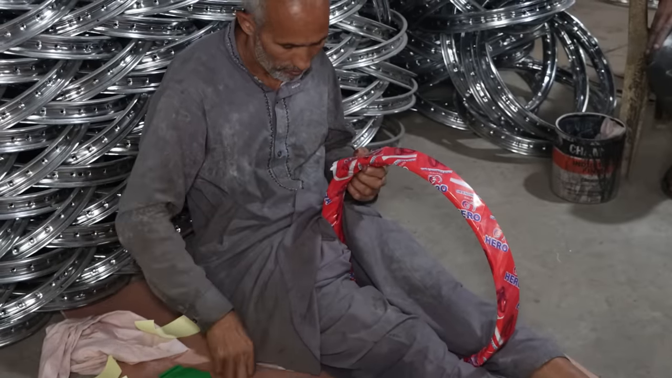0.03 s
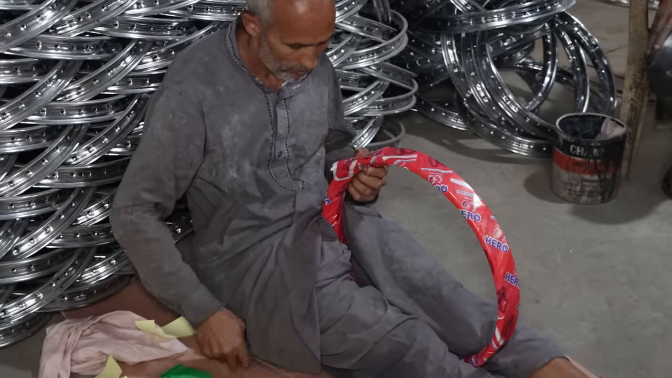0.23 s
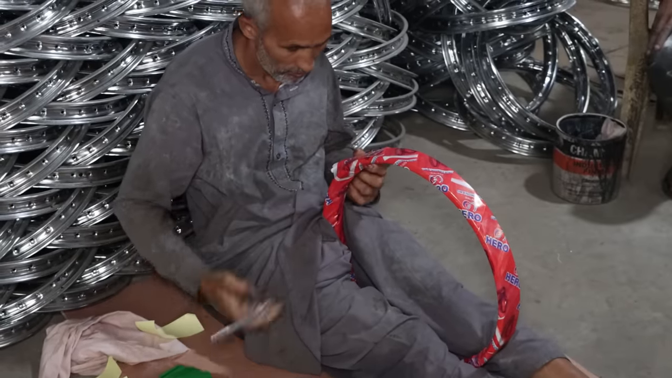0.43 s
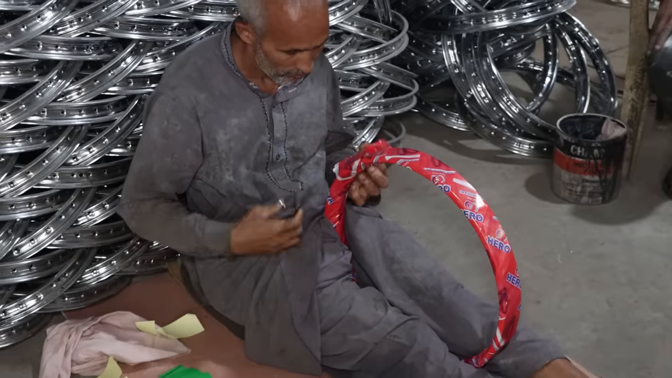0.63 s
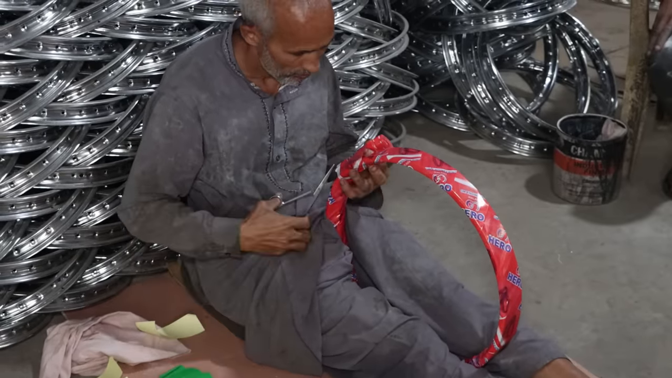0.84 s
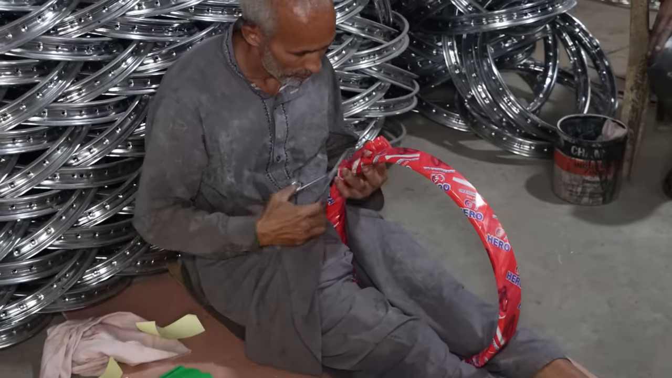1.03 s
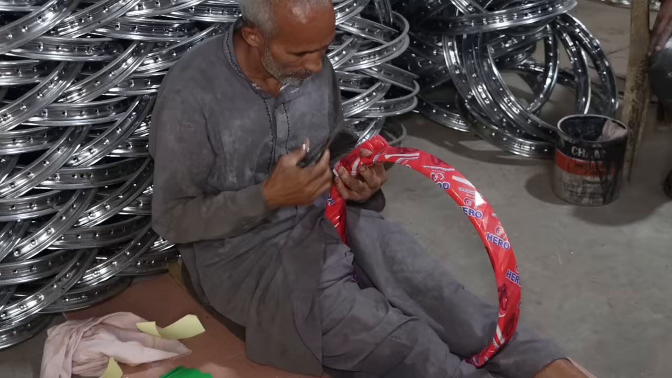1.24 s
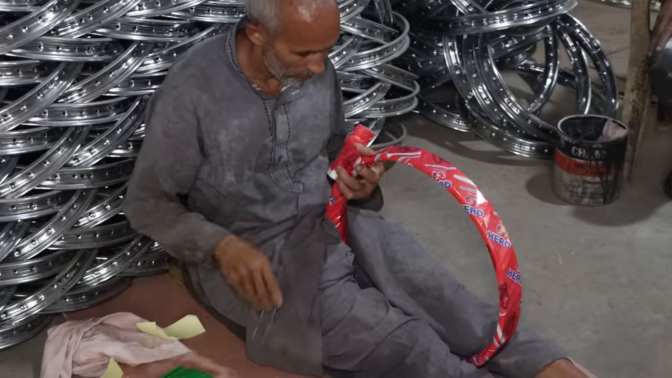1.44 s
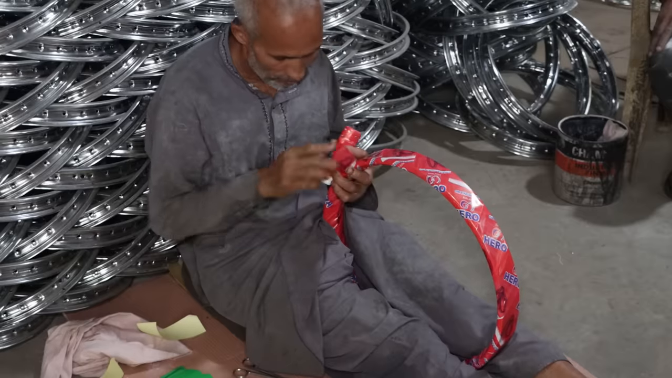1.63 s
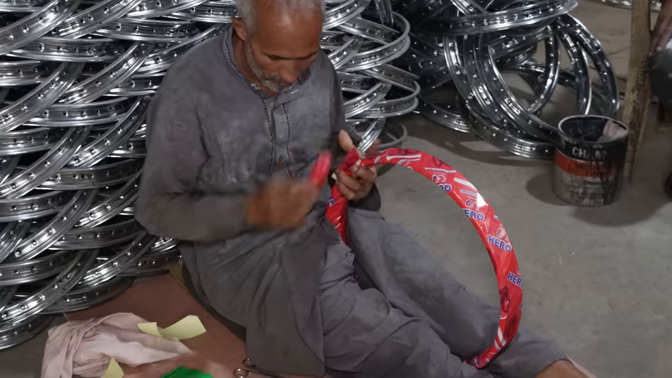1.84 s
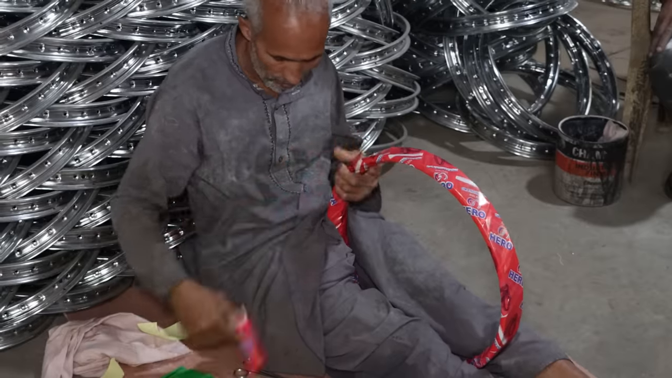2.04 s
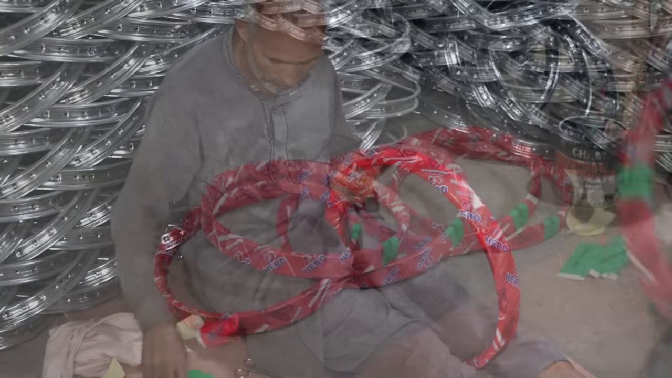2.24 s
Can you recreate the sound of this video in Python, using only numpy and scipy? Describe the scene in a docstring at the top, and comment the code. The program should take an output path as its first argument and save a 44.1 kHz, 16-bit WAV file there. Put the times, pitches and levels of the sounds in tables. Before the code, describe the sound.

A metal rim dropped on a pile makes a loud, short clatter with low bumps at about 1.6 s, then a tiny rattle and brief room tail. Low machine hum runs throughout. Close by, a blade snips and taps near 0.3 s, and snips sharply at 1.2 s, with faint scrapes. A distant heavy crash booms from 0.6 s and fades slowly. Soft rubbing and a tap follow after 2 s.

```python
"""Machines hum in a workshop stacked with metal rims; close by, a bladed tool snips, scrapes and taps.
Something heavy lands far off in the hall, as filtered noise that swells and dies away.
A piece of metal is then dropped on a pile: low sine bumps, a clatter of damped modes and noise cracks,
and a brief chatter of the rims, which the room answers with a tail of decaying noise."""
import sys
import numpy as np
from scipy import signal
from scipy.fft import rfft, irfft, next_fast_len
from scipy.io import wavfile
from scipy.ndimage import uniform_filter1d, map_coordinates

SR = 44100
rng = np.random.default_rng(int(sys.argv[2]) if len(sys.argv) > 2 else 0)


def to_wav(sig):
    """Store sig (one row per channel, or 1-D mono) as 16-bit WAV at the path in sys.argv[1].

    Samples outside -1..1 are clipped; the rate is SR.
    """
    pcm = np.clip(np.atleast_2d(sig), -1, 1) * 32767
    pcm = np.round(pcm).astype(np.int16)
    wavfile.write(sys.argv[1], SR, pcm.T)  # frames by channels


N = 101430

# stereo width of noise, room and modes: (frequency [Hz], side over mid [ratio])
WIDTH = [(60, 0.11), (200, 0.062), (600, 0.3), (1200, 0.52), (2500, 0.95), (12000, 1)]
# spectrum of the noise where metal strikes metal: (frequency [Hz], level [dB])
CRACK = [(40, -48), (200, -42), (500, -22), (800, -8), (1400, 3), (2500, 0), (4500, -10.5), (6000, -11),
         (9000, -19), (13000, -18), (16000, -38)]
CRACK_T60 = 0.014  # s
METAL_PAN_DB = -1  # left over right, of the dropped metal and the pile
TREBLE_HZ = 2530  # where a contact's treble begins
BLADE_WIDTH = 0.6  # side over mid of snips and taps


def amp(db):
    """Level to amplitude: 20 dB is a factor of ten."""
    return 10 ** (np.asarray(db) / 20)


def unit(x):
    """Normalization: scale to rms 1."""
    return x / np.sqrt(np.mean(x ** 2) + 1e-20)


def along(points, hz):
    """Interpolation of (frequency [Hz], value) points along a logarithmic frequency axis."""
    f, v = np.transpose(points)
    return np.interp(np.log(hz + 1), np.log(f + 1), v)


def since(s):
    """Elapsed time: seconds since s, zero before it."""
    return np.maximum(np.arange(N) / SR - s, 0)


def fade(t, t60):
    """Exponential decay: the level falls 60 dB in t60 seconds."""
    return np.exp(-np.log(1000) * t / t60)


def onset(t, rise):
    """Exponential build-up from zero towards 1, with time constant rise in seconds."""
    return 1 - np.exp(-t / rise)


def wobble(rate):
    """Band-limited fluctuation: a smooth random curve with rate knots a second."""
    return map_coordinates(rng.standard_normal(4096), [np.arange(N) * rate / SR], mode="wrap")


def pair(mid, side):
    """Sum and difference stereo: left is mid plus side, right is mid minus side."""
    return np.array([mid + side, mid - side])


def panned(db, pan_db):
    """Level difference panning: left and right gains pan_db apart around db."""
    return amp([[db + pan_db / 2], [db - pan_db / 2]])


def filtered(x, response):
    """Linear filtering: the spectrum of x times a response of frequency."""
    m = next_fast_len(N + SR // 2)
    return irfft(rfft(x, m) * response(np.fft.rfftfreq(m, 1 / SR)), m)[..., :N]


def coloured(x, points, size=2048):
    """Minimum-phase filtering: a causal response of unit energy, found by folding the cepstrum."""
    cepstrum = irfft(np.log(amp(along(points, np.fft.rfftfreq(size, 1 / SR)))))
    cepstrum[1:size // 2] *= 2
    cepstrum[size // 2 + 1:] = 0
    h = irfft(np.exp(rfft(cepstrum)))
    return signal.fftconvolve(x, h[None] / np.linalg.norm(h), axes=1)[:, :N]


def mid_side_gains(spectrum, hz):
    """Frequency-dependent width: gains of mid and side for a (frequency [Hz], level [dB]) spectrum."""
    return amp(along(spectrum, hz)) * np.array([np.ones_like(hz), along(WIDTH, hz)])


def diffuse(spectrum):
    """Diffuse field: noise of rms 1, nearly mono in the bass and wide in the treble."""
    noise = rng.standard_normal((2, N))
    return unit(pair(*filtered(noise, lambda hz: mid_side_gains(spectrum, hz))))


def dying(x, t60s):
    """Frequency-dependent decay: each band of x dies at its own speed."""
    hz, t, z = signal.stft(x, SR, nperseg=512)
    decay = amp(-60 * t / along(t60s, hz)[:, None])
    return signal.istft(z * decay, SR, nperseg=512)[1][:, :N]


def burst(t, width, t60):
    """Impact noise: an exponentially dying stereo burst."""
    noise = rng.standard_normal((2, len(t))) * [[1], [width]]
    return pair(*noise) * fade(t, t60)


def struck(modes, t, scatter_db):
    """Modal synthesis: one stereo ring of damped sines, each blow weighting its modes anew."""
    ring_width = 0.66
    rings = np.array([amp(db + scatter_db * rng.normal()) * fade(t, t60) * np.sin(2 * np.pi * hz * t)
                      for hz, db, t60 in modes])
    mid = rng.choice([-1, 1], len(modes)) @ rings
    side = ring_width * rng.standard_normal(len(modes)) @ rings
    return pair(mid, side)


def add(track, s, x, treble_db):
    """Superposition: lay one contact into the track, its treble raised or lowered by treble_db."""
    low = signal.lfilter(*signal.butter(1, TREBLE_HZ, fs=SR), x)
    part = track[:, round(s * SR):][:, :x.shape[1]]
    part += (low + amp(treble_db) * (x - low))[:, :part.shape[1]]


def room(x):
    """Reverberation: a near sound convolved with coloured noise that decays band by band."""
    # reverberation time: (frequency [Hz], t60 [s])
    decay_times = [(200, 0.34), (800, 0.44), (2000, 0.6), (5000, 0.41), (12000, 0.28)]
    # colour of the tail: (frequency [Hz], level [dB])
    colour = [(150, -5), (500, 12), (900, 8.5), (1500, 0), (2500, -3.5), (3500, -0.5), (5000, -4),
              (12000, 0)]
    rise_s = 0.0013
    hz, t, z = signal.stft(rng.standard_normal((2, SR // 2)), SR, nperseg=256)
    envelope = fade(t, along(decay_times, hz)[:, None]) * onset(t, rise_s)
    z = z * mid_side_gains(colour, hz)[..., None] * envelope
    tail = pair(*signal.istft(z, SR, nperseg=256)[1])
    return signal.fftconvolve(x.mean(0)[None], tail / np.linalg.norm(tail[0]), axes=1)[:, :N]


def machines():
    """Narrow-band modulation: motor lines waver in amplitude and phase over the hall's broadband rush."""
    # motor lines: (frequency [Hz], mid level [dB rms], unsteadiness [ratio])
    lines = [(119.4, -49.5, 0.42), (204.2, -46.5, 1), (259.4, -38, 0.22), (367.2, -48.5, 0.96),
             (430.3, -47, 0.13), (497.6, -44.5, 0.31), (546.5, -50.5, 1), (583.4, -52.5, 0.12)]
    # spectrum of the rush: (frequency [Hz], level [dB])
    rush_spectrum = [(21, -46), (35, -14.5), (86, -25), (105, -16), (195, -4), (227, -8), (258, -5.5),
                     (325, -9), (420, -10), (454, -12.5), (490, -9.5), (758, -20), (840, -18),
                     (1960, -22.5), (2220, -28), (3020, -29), (12400, -46.5), (16000, -56.5)]
    # slow change of the rush: (time [s], level [dB])
    rush_swell = [(0, 0), (.5, 0.24), (1.1, 0.4), (1.5, 1), (1.95, -1), (2.3, -2)]
    waver_rate, hum_width = 14, 0.07  # knots a second, side over mid
    rush_db, patchy_db = -32, 0.6

    hum = np.zeros((2, N))
    for hz, db, unsteady in lines:
        swell = 1 + unsteady * (wobble(waver_rate) + 1j * wobble(waver_rate))
        tone = swell * np.exp(2j * np.pi * (hz * since(0) + rng.random()))
        hum += amp(db) * pair(unit(tone.real), hum_width * wobble(waver_rate) * tone.imag)

    # the rush is slightly uneven over time and frequency
    z = signal.stft(diffuse(rush_spectrum), nperseg=512)[2]
    patches = uniform_filter1d(rng.standard_normal(z.shape[1:]), 6, 0)
    patches = uniform_filter1d(patches, 14, 1)
    rush = signal.istft(z * amp(patchy_db * unit(patches)), nperseg=512)[1][:, :N]
    swell_db = np.interp(since(0), *np.transpose(rush_swell))
    return hum + amp(rush_db + swell_db) * rush


def shears():
    """Impulsive excitation: the blades' bright noise clicks each set off a short modal ring."""
    # clicks: (time [s], level [dB], treble [dB], pan, left over right [dB])
    snips = [(0.082, -46, 10, -2), (0.3, -33, -3, 0), (1.1781, -21, -6, 0), (1.1825, -20, 2.5, -1),
             (1.1835, -16.5, -12, -7), (1.2547, -32, 7.5, -1), (1.399, -37.5, -1.5, 5)]
    # spectrum of a click: (frequency [Hz], level [dB])
    blade_spectrum = [(300, -11), (1400, -4), (2250, 5), (3000, -1.5), (4300, 0.5), (5200, -3.5),
                      (6600, -0.5), (9000, -1), (10000, -2), (11200, 1.5), (12700, -1), (14000, -8),
                      (16000, -15)]
    # ring of the blades: (frequency [Hz], level [dB], t60 [s])
    blade_modes = [(1787, -1, 0.085), (2000, -1.5, 0.095), (2343, -1, 0.073), (3460, -6.5, .1),
                   (4480, -1, .08)]
    click_t60, ring_db, wet_db = 0.01, -19, -0.5  # s, dB, dB
    out, t = np.zeros((2, N)), np.arange(SR // 10) / SR
    for s, db, treble_db, pan_db in snips:
        track = np.zeros((2, N))
        click = burst(t, BLADE_WIDTH, click_t60)
        add(track, s, click * panned(db, pan_db), treble_db)
        near = coloured(track, blade_spectrum)
        ring = struck(blade_modes, t, scatter_db=1.5)
        add(near, s, amp(db + ring_db) * ring, treble_db)
        out += near + amp(wet_db) * room(near)
    return out


def handling(grain_db=2, grain_rate=300):
    """Friction: rubs are grainy noise, and thin metal sings as fluttering tones that ring on after a hold."""
    # rubbing of blades and wrapping: (time [s], length [s], level [dB])
    rubs = [(0.204, 0.16, -41.5), (1.003, 0.32, -45.5), (1.423, 0.095, -50), (2.047, 0.14, -43),
            (2.185, 0.18, -43.5)]
    # spectrum of a rub: (frequency [Hz], level [dB])
    rub_spectrum = [(200, -7), (900, -2), (2000, -4), (5000, -8.5), (12000, -16.5), (16000, -30)]
    # singing of the blades: (time [s], hold [s], lower tone level [dB], upper tone level [dB])
    zings = [(0.135, 0.32, -54.5, -75), (0.232, 0.032, -66, -49), (0.766, 0.04, -53, -57),
             (1.01, 0.12, -54, -62), (1.28, 0.16, -54.5, -62)]
    # centres of the two tones: (lower [Hz], upper [Hz])
    zing_hz = (5350, 9300)
    flutter_hz, flutter_rate = 95, 500  # depth in Hz, knots a second
    rise_s, zing_t60 = 0.011, 0.59

    strokes = sum(amp(db) * np.sin(np.pi * np.minimum(since(s) / length, 1)) ** 2
                  for s, length, db in rubs)
    out = diffuse(rub_spectrum) * strokes * amp(grain_db * wobble(grain_rate))
    for k, hz in enumerate(zing_hz):
        level = sum(amp(levels[k]) * np.minimum(since(s) / rise_s, 1) * fade(since(s + hold), zing_t60)
                    for s, hold, *levels in zings)
        # left and right flutter independently
        pitch = hz + flutter_hz * np.array([wobble(flutter_rate), wobble(flutter_rate)])
        tone = np.sin(2 * np.pi * np.cumsum(pitch, axis=1) / SR)
        out += level * unit(tone * amp(grain_db * wobble(grain_rate)))
    return out


def taps():
    """Soft contact: a touch of the tool on the floor is noise with a blurred onset and a short decay."""
    # touches: (time [s], level [dB])
    tap_times = [(.287, -25.5), (2.175, -30)]
    # spectrum of a touch: (frequency [Hz], level [dB])
    tap_spectrum = [(200, -9), (800, -3), (1500, 1.5), (2400, -7), (3400, -6), (5000, -16), (12000, -25)]
    t60, rise_s, wet_db = 0.034, 0.0009, -3
    touches = sum(amp(db) * onset(since(s), rise_s) * fade(since(s), t60) for s, db in tap_times)
    near = coloured(touches * rng.standard_normal((2, N)), tap_spectrum)
    near = pair(near[0], BLADE_WIDTH * near[1])
    return near + amp(wet_db) * room(near)


def far_blow(grain_db=1.0, grain_rate=120):
    """Distant impact in a reverberant field: a rattling swell of noise, then the hall's slower boom."""
    # spectrum of the crash: (frequency [Hz], level [dB])
    crash_spectrum = [(30, -20), (70, -16), (125, 9), (180, 0.5), (300, 7), (450, 6), (700, -4.5),
                      (1200, -7.5), (2800, -7), (5000, -18.5), (7000, -22.5), (12000, -25.5), (16000, -39)]
    # decay of the crash: (frequency [Hz], t60 [s])
    crash_t60 = [(80, 0.71), (300, 1.3), (1000, 1.2), (3000, 1.05), (12000, 0.51)]
    # spectrum of the boom: (frequency [Hz], level [dB])
    boom_spectrum = [(30, -22), (55, -7), (120, 0.5), (180, -3.5), (260, -1.5), (400, -21), (700, -37),
                     (2000, -66)]
    start_s = 0.6
    crash_db, crash_rise_s = -23.5, 0.012
    boom_db, boom_rise_s, boom_t60 = -24.5, 0.16, 1.58
    t = since(0)
    rattle = amp(crash_db + grain_db * wobble(grain_rate))
    crash = rattle * dying(diffuse(crash_spectrum), crash_t60) * onset(t, crash_rise_s)
    boom = amp(boom_db) * diffuse(boom_spectrum) * fade(t, boom_t60) * onset(t, boom_rise_s)
    return np.pad(crash + boom, ((0, 0), (round(start_s * SR), 0)))[:, :N]


def thuds():
    """Damped oscillation: low bumps on the floor, sines that sag a little in pitch as they die."""
    # bumps: (time [s], starting frequency [Hz], level [dB], rise [s], t60 [s])
    bumps = [(0.632, 109, -24, .012, 0.16), (1.515, 76, -29, 0.036, 0.26), (1.59, 126, -11, 0.01, 0.057),
             (1.598, 245, -6, 0.0039, 0.041), (1.6138, 257, -15, 0.0026, 0.066)]
    sag = 0.021  # part of the phase lost once the bump has died
    out = np.zeros(N)
    for s, hz, db, rise, t60 in bumps:
        t = since(s)
        turns = hz * t * (1 - sag * (1 - fade(t, t60)))
        out += amp(db) * onset(t, rise) * fade(t, t60) * np.sin(2 * np.pi * turns)
    return out


def clatter():
    """Modal excitation: each contact knocks, cracks and rings the same damped modes in its own balance."""
    # contacts of the dropped metal:
    # (time [s], level [dB], treble [dB], deep modes [dB], middle modes [dB], pitch [ratio])
    contacts = [(1.5929, -13, 4, 9, 3, 0.98), (1.6019, -9, -4, 4.5, 6, 1), (1.6077, -17, -7, 17, 9, 1),
                (1.6136, -0.5, 4.5, 0, 0.5, 1), (1.6176, -4, 2.5, 1, 1.5, 1),
                (1.6254, -7.5, -11, 4.5, 3.5, 1.02), (1.6325, -24, 2, -6, 0, 1.2),
                (1.640, -24, -2, 9, -8, 1.03), (1.689, -26, -8, 10.5, 9, 0.97)]
    # its modes: (frequency at pitch ratio 1 [Hz], level [dB], t60 [s])
    metal_modes = [(736, -9.5, 0.077), (813, -5, 0.077), (886, -9.5, 0.078), (930, -6, 0.045),
                   (1476, -3.5, 0.043), (1660, 1.5, 0.02), (1940, -13.5, 0.026), (2227, -14.5, 0.047),
                   (2840, -20, 0.01), (3376, -11, 0.023), (3970, -10.5, 0.015), (4070, -9, 0.017),
                   (4540, -14.5, 0.023)]
    deep_hz, middle_hz = 1100, 2100  # upper edges of the deep and the middle modes
    ring_db, crack_db, knock_db = -12, -13.5, 6
    ring_wet_db, crack_wet_db = -13, -5  # sent to the room
    lean, width = 0.13, 0.47  # the higher modes radiate to the right; random side over mid
    radiate_hz = 517  # the thin metal radiates little below this

    def lift_db(hz, deep_db, middle_db):
        """Mode weighting: the lift of a mode by its frequency band."""
        if hz < deep_hz:
            return deep_db
        return middle_db if hz < middle_hz else 0

    out, t = np.zeros((2, N)), np.arange(SR // 4) / SR
    mode_width = along(WIDTH, np.array(metal_modes)[:, 0])
    for s, db, treble_db, deep_db, middle_db, pitch in contacts:
        rings, cracks = np.zeros((2, 2, N))
        modes = np.array([amp(level + lift_db(hz, deep_db, middle_db) + rng.normal(0, 1))
                          * fade(t, t60) * np.sin(2 * np.pi * hz * pitch * t)
                          for hz, level, t60 in metal_modes])
        spread = mode_width * (lean + width * rng.standard_normal(len(metal_modes)))
        ring = pair(-modes.sum(0), spread @ modes)
        crack = burst(t, width, CRACK_T60)
        knock = amp(knock_db) * (t == 0)  # the single push of first touch
        add(rings, s, amp(db + ring_db) * ring, treble_db)
        add(cracks, s, amp(db) * (amp(crack_db) * crack - knock), treble_db)
        rings = signal.lfilter(*signal.butter(2, radiate_hz, "high", fs=SR), rings)
        cracks = coloured(cracks, CRACK)
        out += (rings + cracks) * panned(0, METAL_PAN_DB)
        out += room(amp(ring_wet_db) * rings + amp(crack_wet_db) * cracks)
    return out


def pile(count=20):
    """Scaling of modes: rims tick and ring ever more weakly, larger ones lower and longer."""
    # modes of a rim of size 1: (frequency [Hz], level [dB], t60 [s])
    rim_modes = [(775, -2, 0.11), (950, 0, 0.073), (1130, -7, .07), (1210, -6, 0.07), (1340, -2, 0.075),
                 (1430, 3, 0.11), (1680, -8, 0.086), (1745, -5, .08), (1885, -8, .05)]
    start_s, length_s, wet_db = 1.624, 0.085, -13
    rattle_db, fall_db_per_s = -38.5, 60
    size_spread, tick_db, tick_treble_db = 0.016, -3, 2
    rings, ticks = np.zeros((2, 2, N))
    t = np.arange(SR // 5) / SR
    # one contact at a random moment in each equal slot
    for delay in length_s * (np.arange(count) + rng.random(count)) / count:
        gain = amp(rattle_db - fall_db_per_s * delay)
        size = 1 + size_spread * rng.normal()
        ring = struck(rim_modes, t / size, scatter_db=0)
        tick = amp(tick_db) * rng.standard_normal((2, len(t))) * fade(t, CRACK_T60)
        add(rings, start_s + delay, gain * ring, 0)
        add(ticks, start_s + delay, gain * tick, tick_treble_db)
    near = rings + coloured(ticks, CRACK)
    return near * panned(0, METAL_PAN_DB) + amp(wet_db) * room(near)


def scene():
    """Superposition and time-difference stereo: the left microphone hears the hall first."""
    lead_s = 0.00019  # left ahead of right
    left_right = np.array([[1], [-1]])
    far = machines() + far_blow()
    hall = filtered(far, lambda hz: np.exp(1j * np.pi * hz * lead_s * left_right))
    return hall + shears() + handling() + taps() + thuds() + clatter() + pile()


def record(dry):
    """Band limiting and saturation: deep bass is cut, peaks round off at full scale, the top is removed."""
    low_cut_hz, top_hz = 36, 16000
    x = signal.sosfilt(signal.butter(4, low_cut_hz, "high", fs=SR, output="sos"), dry)
    rounded = x / (1 + np.abs(x) ** 8) ** (1 / 8)
    return filtered(rounded, lambda hz: hz < top_hz)


dry = scene()
out = record(dry)
to_wav(out)
```